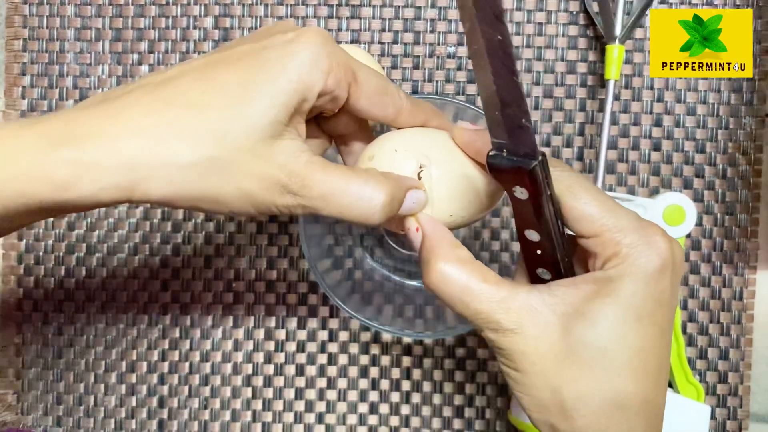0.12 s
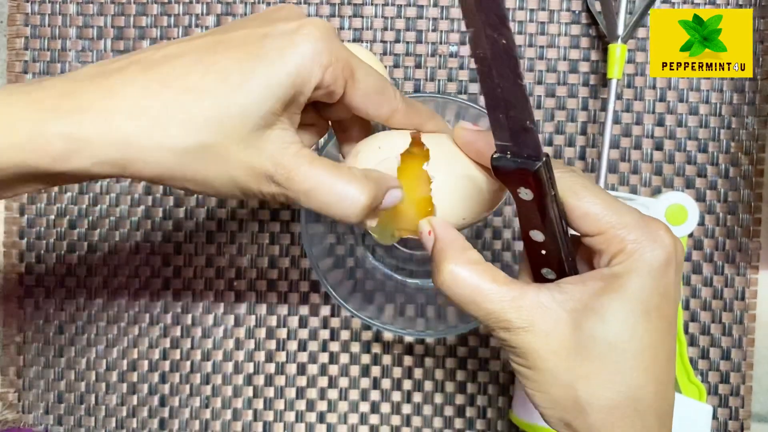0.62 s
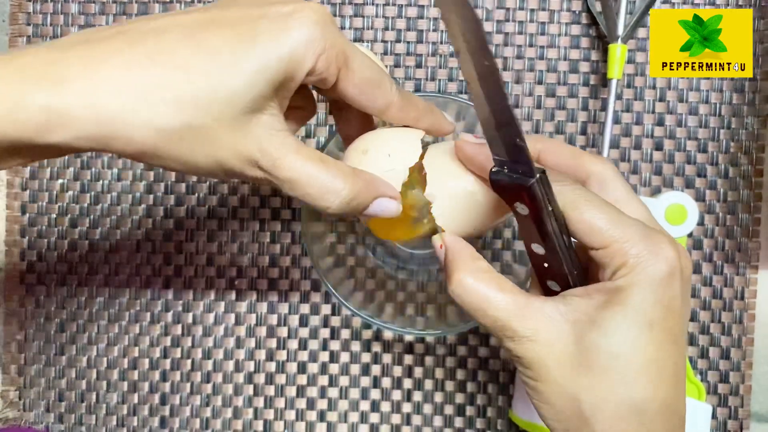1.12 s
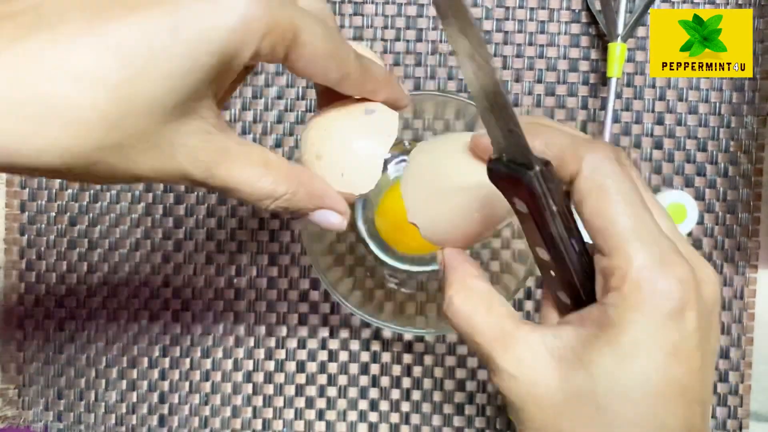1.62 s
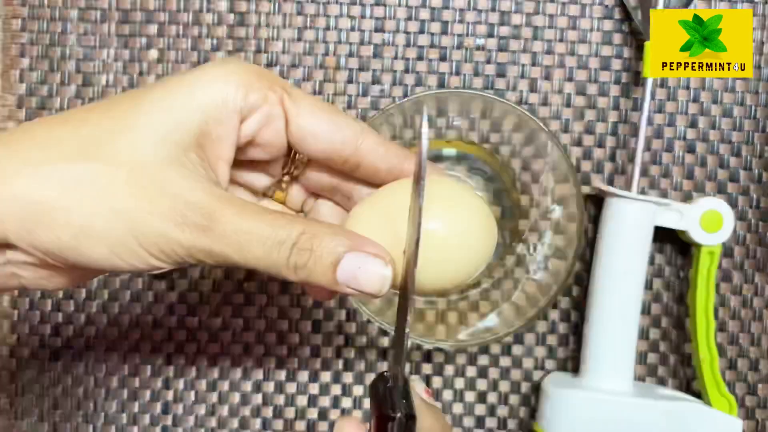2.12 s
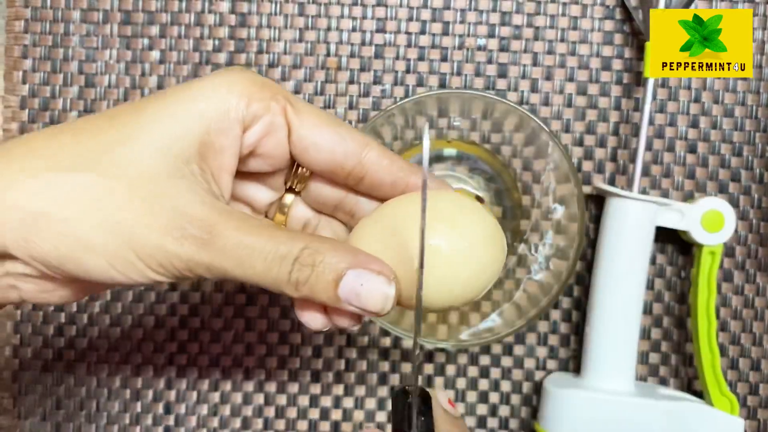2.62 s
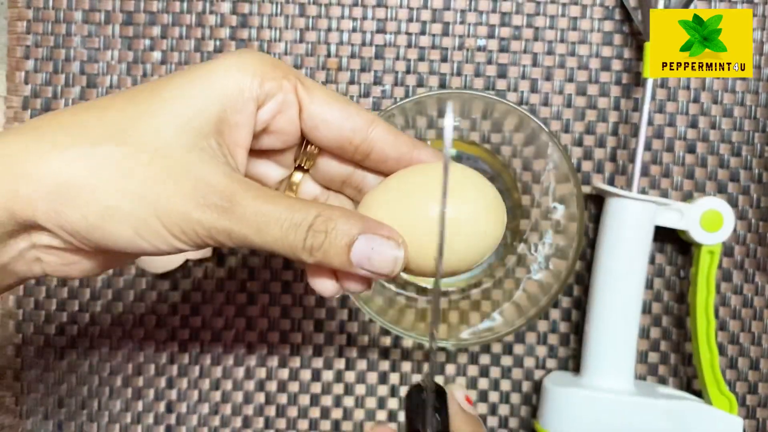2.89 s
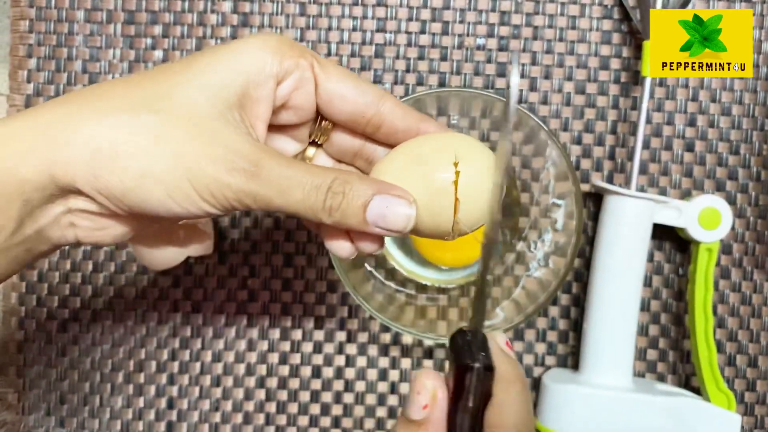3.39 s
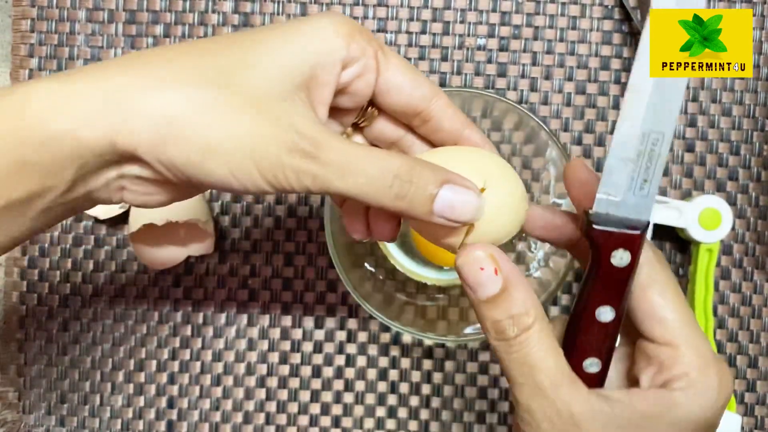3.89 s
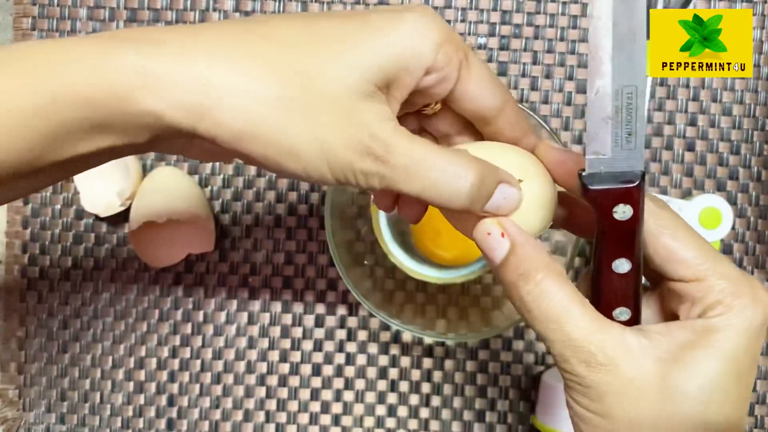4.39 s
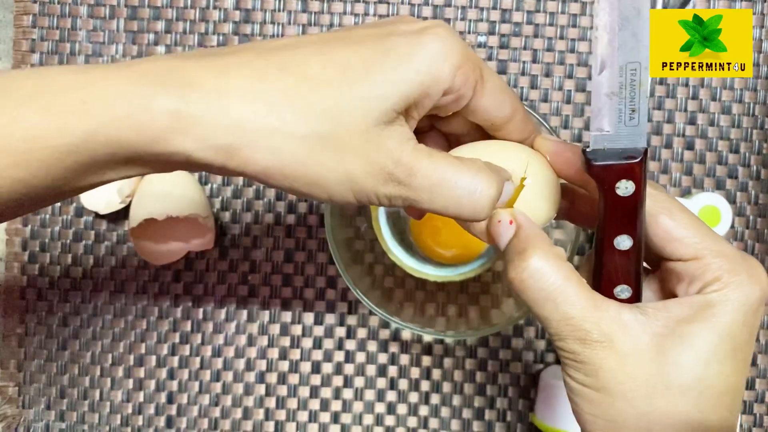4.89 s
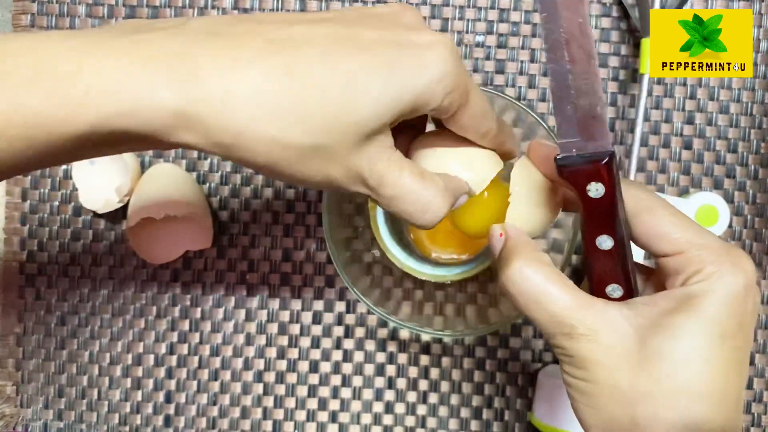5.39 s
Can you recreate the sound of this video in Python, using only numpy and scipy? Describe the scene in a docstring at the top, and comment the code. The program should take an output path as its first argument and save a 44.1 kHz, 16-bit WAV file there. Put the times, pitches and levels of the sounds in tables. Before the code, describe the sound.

Eggshell snaps apart in crisp dry cracks, a knife taps then whacks a second egg, which is pried open with small wet plops.

```python
"""Two eggs are opened by hand in a kitchen, close to a two-port microphone: snaps of noise with shell rings.
Thumbs snap the first shell apart; a knife touches the second egg, then strikes it hard enough to overload:
jolts ring blade and shell modes. Its shell is prised open and the yolk drops as rising sine plops.
Near sounds fill the room by sparse decaying taps. An appliance washes and hums under a soft hiss,
both shaped noise; the whole level drops once, briefly."""
import sys
import numpy as np
from scipy import signal
from scipy.fft import rfft, irfft, next_fast_len
from scipy.io import wavfile
from scipy.ndimage import uniform_filter1d

SR = 44100
rng = np.random.default_rng(int(sys.argv[2]) if len(sys.argv) > 2 else 0)


def master(y):
    """Save y as 16-bit WAV."""
    cut = np.clip(np.atleast_2d(y).T, -1, 1)
    pcm = np.round(cut * 32767)  # scale
    wavfile.write(sys.argv[1], SR, pcm.astype(np.int16))


def voltage_ratio(decibels):
    """Convert decibels (scalar or array-like) to amplitude ratios, 20 dB per decade."""
    exponent = np.asarray(decibels, float) / 20
    return 10 ** exponent


N = 243071  # samples

# appliance wash spectrum: f/Hz, relative level/dB
WASH = [(25, -32), (45, -19), (90, -3), (200, -2), (350, -5), (450, -3.5), (750, -0.6), (1100, -1.5),
        (1600, -10.5), (2500, -9.5), (4000, -16), (5800, -15), (7000, -30.5), (9000, -36), (13000, -81)]
WASH_RMS_DB = -45.5
# wavering hum tones: f/Hz, width/Hz, rms level/dB
HUM = [(64, 37, -58.5), (126.2, 17.3, -56), (424.4, 13.8, -60.5), (491.5, 30, -61)]
# extra lead of the left port in the wash, which comes from elsewhere: f/Hz, lead/rad
WASH_LEAD = [(350, 0), (620, 0.5), (850, -3), (1400, -3.5), (1700, 1), (2100, 1.94), (2700, 2),
             (3200, 1.38), (5000, -1)]
# likeness of the ports in wash, hiss and room: f/Hz, likeness/1
PORT_LIKENESS = [(120, 0.97), (350, 0.79), (1000, 0.82), (1450, 0.34), (1800, 0.67), (2500, 0.04),
                 (3200, 0.79), (4800, 0.28), (6000, 0.94), (7000, 1), (16000, 1)]
# left minus right in wash and hiss: f/Hz, level/dB
PORT_BALANCE = [(250, -1.5), (470, 7), (600, 3), (740, 8), (950, -1), (1550, 1), (1750, 0), (2600, 3.5),
                (2900, -0.2)]

# hiss drift: t/s, level/dB, tilt above the knee/(dB per octave)
HISS = [(0, -47.5, -7), (.65, -50, -3), (1, -48.5, -6), (2, -51, -2.5), (2.1, -49, -15), (3.2, -48.5, -16),
        (3.5, -52, -18), (4, -50.5, -10), (4.7, -49, -11), (5, -50, -17), (5.51, -50.5, -14)]
# hiss spectrum before tilt: f/Hz, relative level/dB
HISS_SHAPE = [(4000, -14), (6000, -1), (7300, -11), (8200, -1.5), (10000, 2), (11000, -2.5), (15700, 0.5),
              (16000, -45)]
# brief hiss swells: peak t/s, rise above the hiss/dB, rise time/s
SWELLS = [(2.0, 8.5, 0.098), (3.42, 8.5, 0.18), (5.185, 8, .1), (5.43, 9, 0.029)]
SWELL_FALL_S = 0.04

# room decay: f/Hz, t60/s
KITCHEN_T60 = [(250, 0.86), (700, 0.49), (1500, 0.59), (4000, 0.61), (8000, 0.35), (15000, 0.45)]
KITCHEN_DB = -10.5

# yolk and white sliding out: t/s, level/dB, starting f/Hz, length/s
YOLK = [(5.111, -32, 360, .015), (5.1165, -26, 1000, .012), (5.165, -38, 880, .025), (5.179, -35, 900, .02),
        (5.188, -33, 930, .025), (5.198, -31, 105, .07), (5.205, -43, 1080, .04), (5.222, -34, 120, .05)]
PLOP_PITCH_RATIO = 1.1  # end over start

# loose shell creaking on after its break: t/s, burst level/dB, murmur level/dB, f/Hz, linger/s
CREAKS = [(.552, -27.5, -52, 2540, .17), (1.164, -46, -51, 2440, 0.15)]
BURST_FALL_DB_PER_S, MURMUR_FADE_DB = 700, -17
UPPER_RATIO, UPPER_BURST_DB, UPPER_MURMUR_DB = 1.74, -3, -11  # second resonance, relative to the first
WAVER_SHARE = 0.06  # rms pitch wavering

# shell fractures: t/s, ring level before growth/dB, ring f/Hz, snap level/dB
CRACKS = [(0.2309, -42, 2860, -24.5), (0.246, -42, 2730, -31.5), (0.3847, -49, 2880, -24.5),
          (0.5162, -22, 3150, -32), (0.5254, -24, 3160, -31), (0.5362, -17, 2570, -19),
          (0.5506, -14.5, 2380, -14), (0.5564, -20, 2230, -31), (0.5613, -21, 2800, -29),
          (0.6838, -23.5, 2175, -33), (0.6954, -33, 3120, -50), (0.7098, -27, 2120, -50),
          (0.7547, -33, 2120, -52), (0.7761, -29, 2200, -46), (0.8699, -27, 2080, -42),
          (1.1633, -24, 2450, -38), (1.1734, -35, 2260, -50), (4.5885, -30, 2020, -28),
          (4.813, -42, 1810, -28), (4.8449, -31, 2470, -35), (4.8534, -41, 1840, -33),
          (4.8868, -26, 1966, -24), (4.908, -46, 2650, -28.5), (5.1107, -30, 3750, -21.5),
          (5.1162, -27.5, 3800, -18)]
# side modes of the shell ring: f ratio/1, relative level/dB, decay length factor/1
SHELL = [(.82, -13, 0.73), (1.45, -5.5, 0.32), (1.8, -7.5, 0.63), (2.25, -14.5, 0.86)]
# snap spectrum: f/Hz, relative level/dB
SNAP = [(500, -18), (1500, -5), (3000, -12), (5000, -4), (7500, 3), (10000, -4), (13000, -6), (16000, -12),
        (17000, -62)]
RING_CYCLES = 4.34  # decay to 1/e, before each mode's length factor
RING_GROWTH, RING_PIVOT_DB = 0.4, -22  # extra dB per dB of ring level above the pivot
# spells of faint fractures while thumbs pull: start t/s, end t/s
PULLS = [(.23, .26), (.54, .8), (1.12, 1.2), (4.59, 4.78), (4.84, 4.94)]
FAINT_PER_PULL, FAINT_LOW_HZ, FAINT_HIGH_HZ = 3, 1900, 2900
FAINT_MAX_RING_DB, FAINT_MAX_SNAP_DB = -40, -40  # ring before growth

# knife edge on the full egg: t/s, level/dB, crushing time/ms, shatter re level/dB, body level/dB
KNIFE = [(2.6043, -30.5, 3.9, -4, -41), (2.616, -31, 1.6, -4, -47), (2.621, -33.5, 5.5, -11, -60),
         (3.1275, -6.5, 5.4, -4, -21), (3.133, -29.5, 13.5, 9.5, -30), (3.249, -45.5, 8.6, 10, -36.5)]
# shatter spectrum: f/Hz, relative level/dB
SHATTER = [(200, -42), (700, 8), (1500, 2), (4000, 3), (8000, 11), (14000, -3), (17000, -20)]
# full egg wobbling: f/Hz, relative level/dB, t60/s
BODY = [(306, 8.5, 0.044), (174, -5, 0.055), (702.6, 8, 0.052), (880, 3, 0.042)]
# blade and shell modes: f/Hz, relative level/dB, t60 before the ring factor/s,
# and once the shell is broken: pitch sag share/1, level change/dB
BLADE = [(1010, -26, .03, 0, 14), (1250, -26, .03, 0, 11), (1580, -3, .02, .04, 2),
         (3160, -2, .024, .055, -6), (3940, -20, .012, 0, 13), (4450, -14, .014, 0, 5),
         (5520, -1, .014, 0, -4), (5790, -8, .009, 0, 11), (6300, -10, .007, 0, 9),
         (7650, -1.5, .013, 0, 2), (10100, -6, .01, 0, 0), (11700, -11, .012, 0, 0),
         (14900, -12, .012, 0, 4)]
BREAK_S = 3.12  # the shell is broken from here on
RING_WHOLE, RING_BROKEN = 1.3, 0.42  # t60 factors: the broken shell grips and damps the blade

PORT_DELAY_S, PORT_FROM_HZ = 0.000162, 4300  # left leads, as by a delay above this frequency
LEAD_BEND_RAD = 0.35  # bends the phase lead away from that of a plain delay
# drop of the whole level: t/s, floor level/dB, linear ramp time per unit gain/s
DIP = (2.0225, -26, .045)


def read(points, hz):
    """Straight lines on a log-frequency axis."""
    f, value = np.transpose(points)
    return np.interp(np.log(hz + 1), np.log(f + 1), value)


def evened(x):
    """Scales to rms 1."""
    return x / np.sqrt(np.mean(x ** 2) + 1e-20)


def add(mix, s, sound):
    """Mixes a sound in at time s."""
    part = mix[round(s * SR):][:len(sound)]
    part += sound[:len(part)]


def low_cut(x, hz, order):
    """High-pass Butterworth filter."""
    return signal.sosfilt(signal.butter(order, hz, "high", fs=SR, output="sos"), x)


def colour(x, gain):
    """Filters x by gain(hz), real or complex."""
    size = next_fast_len(x.shape[-1] + 2048)
    spectrum = rfft(x, size) * gain(np.fft.rfftfreq(size, 1 / SR))
    return irfft(spectrum, size)[..., :x.shape[-1]]


def resonate(x, hz, width_hz):
    """A resonance that follows the curve hz, applied twice for steep sides."""
    turn = np.exp(2j * np.pi * np.cumsum(hz * np.ones(len(x))) / SR)
    r = np.exp(-np.pi * width_hz / SR)
    return (turn * signal.lfilter([1], np.poly([r, r]), x / turn)).real


def port_likeness(hz):
    """Share of the left port's sound heard alike in the right."""
    return np.clip(read(PORT_LIKENESS, hz), 0, 1)


def diffuse(level_db, lead, patchy_db):
    """Two-port noise from random short-time spectra; level_db(hz, t) shapes it, patches drift through it."""
    frames, hz = N // 256 + 5, np.fft.rfftfreq(1024, 1 / SR)[:, None]
    a, b, c, d, patches = rng.standard_normal((frames, 513, 5)).T
    patches = uniform_filter1d(patches, size=12, axis=0)
    patches = evened(uniform_filter1d(patches, size=12, axis=1))
    same = port_likeness(hz)
    left, other = a + 1j * b, c + 1j * d
    right = (same * left + np.sqrt(1 - same ** 2) * other) * np.exp(-1j * lead(hz))
    side = voltage_ratio(read(PORT_BALANCE, hz) / 2)
    gain = voltage_ratio(level_db(hz, np.arange(frames) * 256 / SR) + patchy_db * patches)
    z = np.array([left * side, right / side]) * gain
    return signal.istft(z, nperseg=1024, noverlap=768)[1][:, :N]


def wash():
    """Broad appliance noise plus hum tones: noise through narrow resonances."""
    broad = diffuse(lambda hz, t: read(WASH, hz), lambda hz: read(WASH_LEAD, hz), patchy_db=2.32)
    tones = np.zeros(N)
    for hz, width_hz, db in HUM:
        tones += voltage_ratio(db) * evened(resonate(rng.standard_normal(N), hz, width_hz))
    return voltage_ratio(WASH_RMS_DB) * evened(broad) + tones


def hiss():
    """Treble noise of drifting level and brightness, with brief swells."""
    s, db, tilt_db = np.transpose(HISS)
    t = np.arange(N) / SR

    def shape_db(hz, t):
        octaves = np.log2(np.maximum(hz / 9450.0, 1))
        return read(HISS_SHAPE, hz) + np.interp(t, s, tilt_db) * octaves

    swell_db = np.zeros(N)
    for at, up_db, rise in SWELLS:
        swell_db += np.interp(t, [at - rise, at, at + SWELL_FALL_S], [0, up_db, 0])
    return evened(diffuse(shape_db, lambda hz: 0, patchy_db=1.0)) * voltage_ratio(np.interp(t, s, db) + swell_db)


def kitchen(x):
    """Room: sparse taps of random sign, each band dying at its own speed, partly alike at the ports."""
    taps = np.zeros((2, SR))
    at = np.arange(200, SR - 20, 20) + rng.integers(0, 20, (2, (SR - 201) // 20))
    np.put_along_axis(taps, at, rng.choice([-1., 1.], at.shape), 1)
    hz, t, z = signal.stft(taps, SR, nperseg=256)
    same = port_likeness(hz)[:, None]
    z[1] = same * z[0] + np.sqrt(1 - same ** 2) * z[1]
    decay = voltage_ratio(-60 * t / read(KITCHEN_T60, hz)[:, None])
    tail = signal.istft(z * decay, SR, nperseg=256)[1]
    tail /= np.linalg.norm(tail[0])
    return voltage_ratio(KITCHEN_DB) * signal.fftconvolve(x[None], tail, axes=1)[:, :N]


def yolk(db, hz, length_s):
    """A soft wet plop: a sine that bends upward while it falls by 40 dB."""
    t = np.arange(0, length_s, 1 / SR)
    turns = np.cumsum(hz * PLOP_PITCH_RATIO ** (t / length_s)) / SR
    onset = 1 - np.exp(-t / 0.0011)
    return voltage_ratio(db - 40 * t / length_s) * onset * np.sin(2 * np.pi * turns)


def creak(burst_db, murmur_db, hz, linger_s):
    """Dense tiny slips excite the loose shell's wavering resonances: a short burst, then a fading murmur."""
    t = np.arange(0, linger_s, 1 / SR)
    burst = voltage_ratio(burst_db - BURST_FALL_DB_PER_S * t)
    murmur = voltage_ratio(murmur_db + MURMUR_FADE_DB * (t / linger_s) ** 2)
    slips = rng.standard_normal(len(t)) * (rng.random(len(t)) < 700 / SR)  # about 700 per s
    waver = evened(uniform_filter1d(rng.standard_normal(len(t)), size=900))
    pitch = hz * (1 + WAVER_SHARE * waver)
    lower = (burst + murmur) * evened(resonate(slips, pitch, width_hz=370))
    upper_level = voltage_ratio(UPPER_BURST_DB) * burst + voltage_ratio(UPPER_MURMUR_DB) * murmur
    upper = upper_level * evened(resonate(slips, UPPER_RATIO * pitch, width_hz=400))
    return lower + upper


def crack(ring_db, hz, snap_db):
    """A fracture: a bright snap of noise and a brief ring of the shell wall."""
    t, tau = np.arange(1500) / SR, RING_CYCLES / hz
    noise, phases = rng.standard_normal(1500), rng.random(len(SHELL) + 1)
    rise = 1.49 * (1 - np.exp(-t / 0.00035))
    growth_db = RING_GROWTH * (ring_db - RING_PIVOT_DB)
    ring = np.zeros(1500)
    for (ratio, db, last), phase in zip([(0.99, 0.007, 0.9)] + SHELL, phases):  # main mode first
        fade_db = -20 * np.log10(np.e) * t / (tau * last)
        ring += voltage_ratio(db + growth_db + fade_db) * np.sin(2 * np.pi * (hz * ratio * t + phase))
    snap = evened(colour(noise, lambda f: voltage_ratio(read(SNAP, f)))) * np.exp(-t / (1.37 * tau))
    both = rise * (voltage_ratio(ring_db) * ring + voltage_ratio(snap_db) * snap)
    return low_cut(both, 1730, order=4)  # the fracture stays above about 1730 Hz


def faint_cracks():
    """Rows like CRACKS, placed and pitched by chance within each pull."""
    spells = np.repeat(PULLS, FAINT_PER_PULL, axis=0)
    when, pitch, size = rng.random((len(spells), 3)).T
    s = spells[:, 0] + when * (spells[:, 1] - spells[:, 0])
    hz = FAINT_LOW_HZ + pitch * (FAINT_HIGH_HZ - FAINT_LOW_HZ)
    return zip(s, FAINT_MAX_RING_DB - 6 * size, hz, FAINT_MAX_SNAP_DB - 6 * size)


def knife(db, crush_ms, shatter_db, body_db, broken):
    """The crushing edge jolts blade modes, the shell shatters, the body wobbles: (ring, shatter and body)."""
    t = np.arange(5000) / SR
    push = np.exp(-(np.arange(900) / SR / (crush_ms / 1000)) ** 3)
    jolts, noise = rng.standard_normal(900), rng.standard_normal(900) * push
    ring = np.zeros(5000)
    for hz, level_db, t60, sag, change_db in BLADE:
        hz *= 1 - sag * broken
        fade = voltage_ratio(-60 * t / (t60 * (RING_BROKEN if broken else RING_WHOLE)))
        drive = push * (1 + 1.4 * np.roll(jolts, rng.integers(900)))  # uneven pressure keeps the mode fed
        drive[0] = 1.68 * fade.sum()  # first contact sets it going at once
        mode = signal.fftconvolve(drive, fade)[:5000] * np.sin(2 * np.pi * (hz * t + rng.random()))
        dull_db = 0.02 * db * np.log2(hz / 1500)  # a softer touch stirs the high modes less
        ring += voltage_ratio(db + level_db + change_db * broken + dull_db) * mode / abs(mode).max()
    crush = np.zeros(5000)
    for hz, level_db, t60 in BODY:
        crush += voltage_ratio(body_db + level_db - 60 * t / t60) * np.sin(2 * np.pi * (hz * t + rng.random()))
    crush *= (1 - np.exp(-t / 0.0032)) ** 2  # liquid mass takes a moment to move
    add(crush, 0, voltage_ratio(db + shatter_db) * colour(noise, lambda f: voltage_ratio(read(SHATTER, f))))
    return low_cut(ring, 860, order=4), crush  # the blade ring stays above about 860 Hz


def scene():
    """Hands, knife and egg in the kitchen over wash and hiss."""
    near, aimed = np.zeros((2, N))  # aimed: blade ring, towards the microphone
    for s, *row in YOLK:
        add(near, s, yolk(*row))
    for s, *row in CREAKS:
        add(near, s, creak(*row))
    for s, *row in [*CRACKS, *faint_cracks()]:
        add(near, s, crack(*row))
    for s, *row in KNIFE:
        ring, crush = knife(*row, broken=s > BREAK_S)
        add(aimed, s, ring)
        add(near, s, crush)
    room = kitchen(near + voltage_ratio(-19) * aimed)
    return near + aimed + room + wash() + hiss()


def port_lead(hz):
    """Radians by which the left port leads, as for a near source."""
    turn = 2 * np.pi * PORT_DELAY_S * np.maximum(hz - PORT_FROM_HZ, 0)
    return turn + LEAD_BEND_RAD * np.sin(turn)


def dip_gain():
    """The level drops at once and ramps back linearly."""
    s, floor_db, ramp_s = DIP
    since = np.arange(N) / SR - s
    return np.where(since < 0, 1, np.clip(voltage_ratio(floor_db) + since / ramp_s, 0, 1))


def roll_off(x):
    """The treble ends steeply here."""
    return signal.sosfilt(signal.butter(12, 16850, fs=SR, output="sos"), x)


def record(dry):
    """Phase turns between the ports, level dip, overload clipping, low cut."""
    right = colour(dry[1], lambda hz: np.exp(-1j * port_lead(hz)))
    ports = np.array([dry[0], right])
    overload = np.clip(ports * dip_gain(), -1, 1)
    no_rumble = low_cut(overload, 38, order=2)
    return roll_off(no_rumble)


dry = scene()
out = record(dry)
master(out)
```